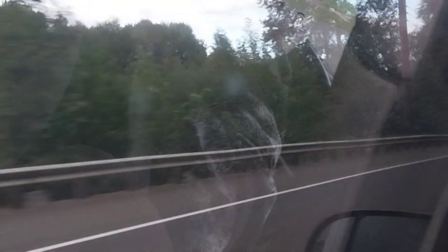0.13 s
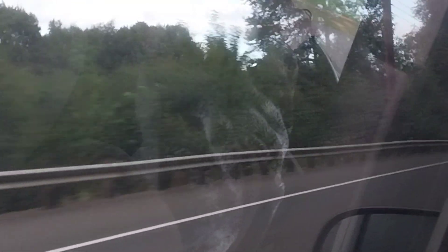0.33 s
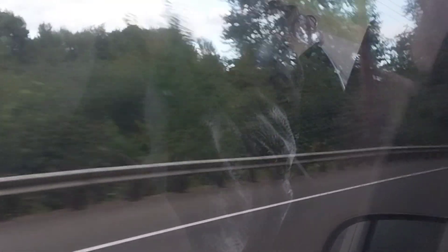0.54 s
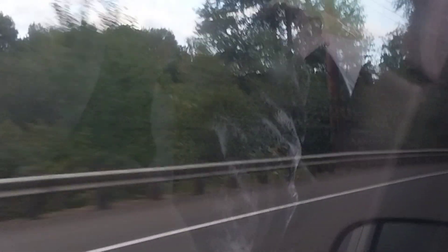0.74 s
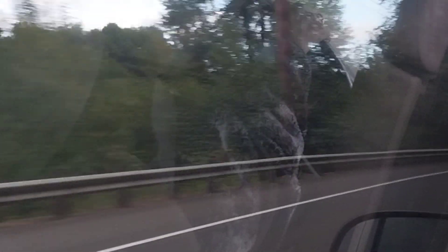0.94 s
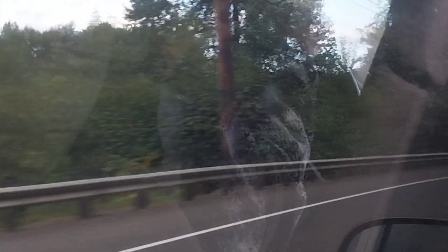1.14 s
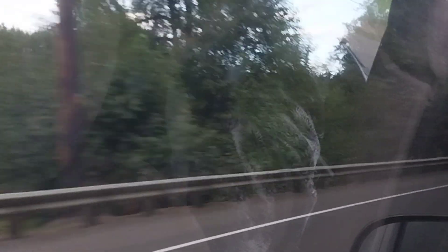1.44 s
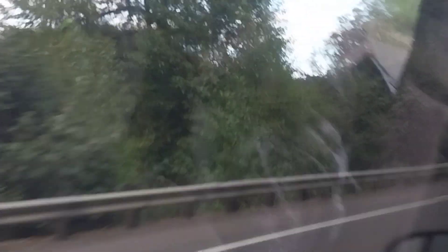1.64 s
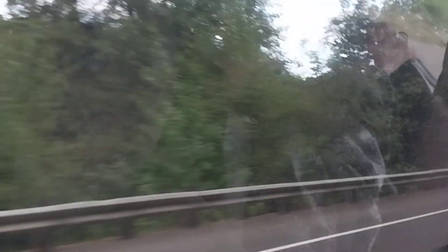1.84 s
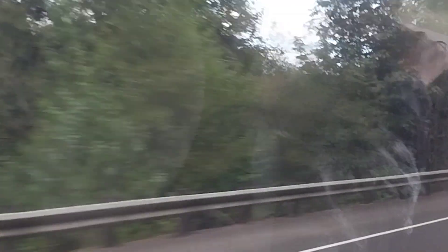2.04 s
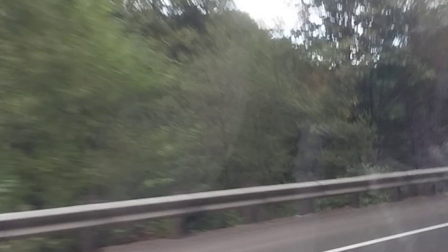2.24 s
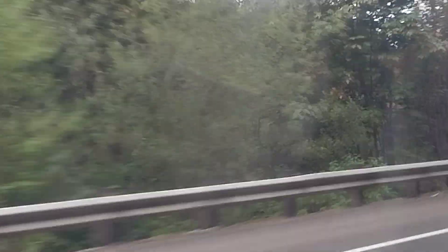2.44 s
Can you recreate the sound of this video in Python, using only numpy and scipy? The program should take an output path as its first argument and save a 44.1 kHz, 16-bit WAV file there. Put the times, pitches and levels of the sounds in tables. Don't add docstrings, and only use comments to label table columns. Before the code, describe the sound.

A moving car heard from inside its cabin for about 2.6 seconds. Deep, boomy road rumble is strongest at the very start, then wavers gently with small bumps. Even, muffled tyre roar continues throughout. Faint dry plastic ticks scatter along, clearest near 1.25, 1.3 and 1.5 seconds, sparser after 1.9. Very quiet, wide air hiss stays steady beneath; the speed holds constant to the end.

```python
import sys
import numpy as np
from scipy import signal
from scipy.fft import rfft, irfft, next_fast_len
from scipy.io import wavfile
from scipy.ndimage import uniform_filter1d, map_coordinates

SR = 44100
rng = np.random.default_rng(int(sys.argv[2]) if len(sys.argv) > 2 else 0)


def how_loud(loudness_db):
    steps = np.asarray(loudness_db, float) / 20
    return 10 ** steps


def output_pcm(signal):
    pcm = np.clip(np.atleast_2d(signal).T, -1, 1) * 32767
    wavfile.write(sys.argv[1], SR, np.round(pcm).astype(np.int16))


N = 113337


def unit(x):
    mid = np.atleast_2d(x).mean(0)
    return x / np.sqrt(np.mean(mid ** 2) + 1e-20)


def along(points, hz):
    f, v = np.transpose(points)
    return np.interp(np.log(hz + 1), np.log(f + 1), v)


def curves(rows):
    s, *columns = np.transpose(rows)
    t = np.arange(N) / SR
    return [np.interp(t, s, column) for column in columns]


def wobble(rate):
    place = np.arange(N) * min(rate, 100) / SR
    return map_coordinates(rng.standard_normal(400), [place])


def filtered(x, response):
    m = next_fast_len(N + 8192)
    hz = np.fft.rfftfreq(m, 1 / SR)
    return irfft(rfft(x, m) * response(hz), m)[..., :N]


# f/Hz, width/Hz, level/dB
CABIN_MODES = [(65.4, 14, -8), (107, 16.3, 5), (176, 43, 1), (219.5, 18, 3), (324, 23, -1), (581, 18, 2),
               (775, 55, 0.5), (1214, 96, 2), (1468, 48, -4.5), (1547, 130, 5), (1786, 70, 5),
               (4090, 860, 4.5), (8600, 900, -1.5)]


def cabin(hz):
    return how_loud(sum(db / (1 + (2 * (hz - c) / w) ** 2) for c, w, db in CABIN_MODES))


# f/Hz, level/dB
ROAD_LEAN = [(35, 7), (80, -4.5), (115, 4), (240, 1.6), (370, 5.5), (660, -3), (900, 3), (1800, -2)]
# f/Hz, phase/rad
ROAD_LEAD = [(30, -1.2), (90, -0.38), (300, 0.54), (780, 0.61), (1100, 1), (1400, -0.18), (2000, -0.84)]


def ports(hz):
    half = how_loud(along(ROAD_LEAN, hz) / 2) * np.exp(.5j * along(ROAD_LEAD, hz))
    return np.array([half, 1 / half])


# f/Hz, likeness (0-1)
ROAD_ALIKE = [(30, 1), (80, 0.95), (170, 0.93), (350, 0.92), (900, 0.68), (1050, 0.73), (1600, 0.21),
              (2100, 0.43)]


def rush(spectrum, patchy_db, alike=ROAD_ALIKE, heard=ports):
    noise = rng.standard_normal((2, N + 512))
    z = signal.stft(noise, nperseg=512)[2]
    field = rng.standard_normal(z.shape[1:])
    field = uniform_filter1d(field, size=6, axis=0)
    field = uniform_filter1d(field, size=8, axis=1)
    patches = how_loud(patchy_db * field / field.std())
    pair = signal.istft(z * patches, nperseg=512)[1][:, :N]

    def colour(hz):
        turn = np.arccos(np.clip(along(alike, hz), -1, 1)) / 2
        return how_loud(along(spectrum, hz)) * cabin(hz) * np.array([np.cos(turn), np.sin(turn)])

    mid, side = filtered(pair, colour)
    return unit(filtered(np.array([mid + side, mid - side]), heard))


# t/s, suspension shake level/dB, body boom level/dB, shake left over right level/dB
ROAD_BUMPS = [(0, -18, -14, 1), (.1, -23, -21.5, 4), (.36, -23.5, -19, 3), (.5, -21, -21.5, 0),
              (.62, -23, -16.5, 1), (.8, -31, -19.5, 6), (.95, -23.5, -17.5, 3), (1.1, -26.5, -18.5, 1),
              (1.2, -23, -15.5, 6), (1.35, -25, -17.5, 5), (1.5, -22.5, -16.5, 4), (1.7, -25, -18, 2),
              (1.82, -20.5, -17.5, 1), (1.93, -24, -19, 12), (2.18, -21.5, -18.5, 11),
              (2.3, -22.5, -21.5, 10.5), (2.44, -27.5, -20.5, 10.5), (2.57, -23, -19.5, 12)]
# f/Hz, level/dB
SHAKE_TONE = [(12, -48), (25, -16), (40, -10.5), (55, 0), (70, 1), (85, -12), (120, -19), (210, -120)]
# f/Hz, level/dB
BOOM_TONE = [(50, -19.5), (85, -0.5), (125, -3.5), (170, 1), (205, -3.5), (235, -2), (350, -13), (600, -76)]


def road():
    shake_db, boom_db, pan_db = curves(ROAD_BUMPS)
    sides_db = np.array([pan_db / 2, -pan_db / 2])
    shake = how_loud(shake_db + 0.21 * wobble(7.2) + sides_db) * rush(SHAKE_TONE, patchy_db=-0.3)
    boom = how_loud(boom_db + 0.2 * wobble(21)) * rush(BOOM_TONE, patchy_db=0.2)
    return shake + boom


# t/s, level/dB
TYRE_ROAR = [(0, -26), (.2, -26.5), (.4, -25), (.6, -25.5), (.8, -25), (1, -26), (1.25, -25), (1.5, -25),
             (1.75, -25.5), (2, -24.5), (2.25, -26), (2.57, -27)]
# f/Hz, level/dB
ROAR_TONE = [(190, -33.5), (320, -1.5), (521, -6), (591, -5), (849, -6.5), (1000, -13), (1250, -13.5),
             (1430, -18), (2100, -29.5), (2730, -38), (4620, -120)]


def tyres():
    roar_db, = curves(TYRE_ROAR)
    return how_loud(roar_db + 0.71 * wobble(8.95)) * rush(ROAR_TONE, patchy_db=0.0)


# f/Hz, level/dB
WINDOW_LEAN = [(1900, -3.5), (2800, 2.5), (4200, 7), (5500, 3.5), (7600, 1.5), (10000, -4.5), (12800, 3),
               (15500, 1)]


def window_side(hz):
    lag_s = .00056
    half = how_loud(along(WINDOW_LEAN, hz) / 2) * np.exp(1j * np.pi * hz * lag_s)
    return np.array([half, -1 / half])


# t/s, peak level/dB
CLEAR_TICKS = [(0.0134, -37), (0.2334, -36), (0.2804, -32), (0.3564, -41), (0.377, -36), (0.4254, -33),
               (0.5184, -34), (0.5904, -40), (0.6365, -33), (0.6714, -32), (0.7154, -35), (0.7497, -35),
               (0.8204, -31), (0.91, -44), (0.9604, -35), (1.0374, -42), (1.0614, -40), (1.1443, -37),
               (1.1794, -34), (1.2431, -24.5), (1.3214, -28.5), (1.4284, -39), (1.485, -34),
               (1.5314, -25.5), (1.6317, -34), (1.8243, -32), (1.8896, -38), (2.273, -35)]
# f/Hz, level/dB
TRIM_TONE = [(1200, -30), (2500, -4), (4200, 0), (6000, -6), (9000, -14), (12500, -9), (15700, -14)]


def trim(count=160):
    tick_db, t60_s, rise_s = -7, .035, .0015
    chatter_db, chatter_spread_db = -47, 11
    ticks = list(CLEAR_TICKS)
    for u, v in rng.random((count, 2)):
        ticks.append((u * N / SR, chatter_db - tick_db - chatter_spread_db * v))
    out = np.zeros((2, N + SR))
    t = np.arange(SR // 20) / SR
    for s, db in ticks:
        direct, *walls = rng.standard_normal((3, len(t)))
        envelope = how_loud(db + tick_db - 60 * t / t60_s) * (1 - np.exp(-t / rise_s))
        start = round(s * SR)
        out[:, start:start + len(t)] += envelope * (direct + np.array(walls)) / np.sqrt(2)

    def from_window(hz):
        left_right = how_loud([[1.5], [-1.5]])
        return how_loud(along(TRIM_TONE, hz) + 6) * window_side(hz) * left_right

    return filtered(out[:, :N], from_window)


# t/s, level/dB
AIR_HISS = [(0, -46), (.1, -49), (.4, -48), (.7, -47.5), (.8, -48.5), (1, -47.5), (1.25, -47), (1.6, -48.5),
            (1.9, -47.5), (2.2, -48), (2.57, -48)]
# f/Hz, level/dB
HISS_TONE = [(1120, -15.5), (1900, -5), (2300, -3.5), (2940, -6), (3500, -10), (4400, -12), (5500, -14.5),
             (8000, -20), (10000, -35), (14000, -60)]
# f/Hz, level/dB
FIZZ_TONE = [(6000, -30), (8000, -5), (9300, -0.5), (10200, 2.5), (12500, 1), (14000, -2.5), (15700, -4.5)]
# f/Hz, likeness (0-1)
AIR_LIKENESS = [(2000, 0.02), (3300, 0.14), (4200, 0.25), (5100, 0.05), (6200, 0), (11000, 0), (15000, 0)]


def air():
    hiss_db, = curves(AIR_HISS)
    flutter_db = .3 * wobble(20) + .6 * wobble(45)
    fizz = how_loud(-60 + flutter_db) * rush(FIZZ_TONE, .6, AIR_LIKENESS, window_side)
    hiss = how_loud(1.4 + hiss_db + flutter_db) * rush(HISS_TONE, 1.0, AIR_LIKENESS, window_side)
    return hiss + fizz


def scene():
    return road() + tyres() + trim(count=160) + air()


def top_cut(x):
    return signal.sosfilt(signal.butter(12, 15770, fs=SR, output="sos"), x)


def record(dry):
    return top_cut(dry)


dry = scene()
out = record(dry)
output_pcm(out)
```